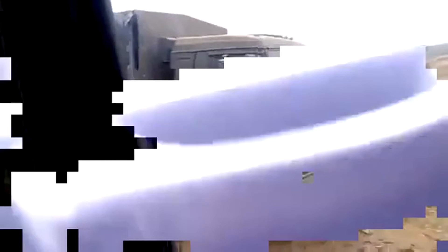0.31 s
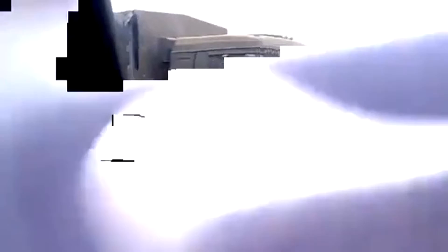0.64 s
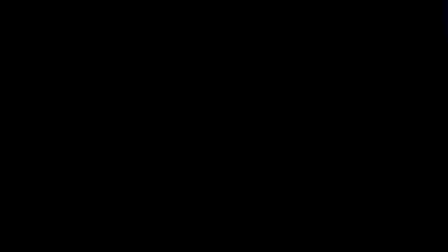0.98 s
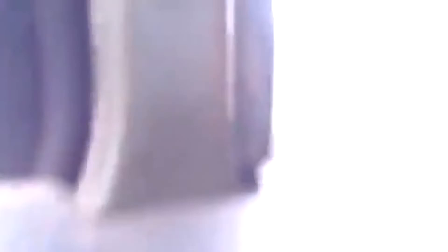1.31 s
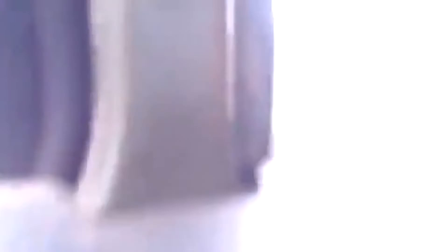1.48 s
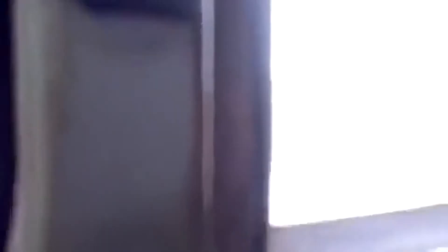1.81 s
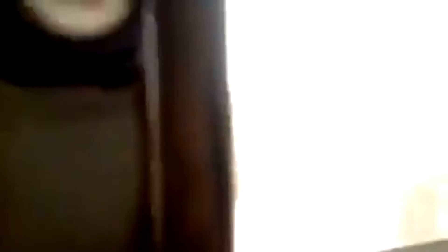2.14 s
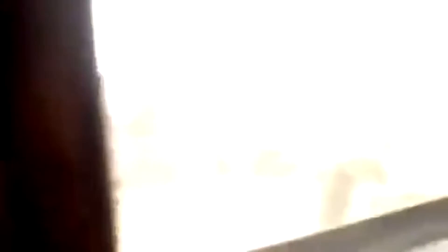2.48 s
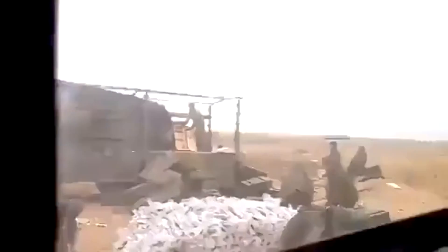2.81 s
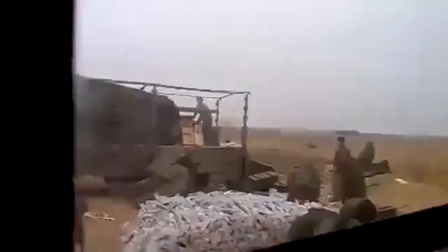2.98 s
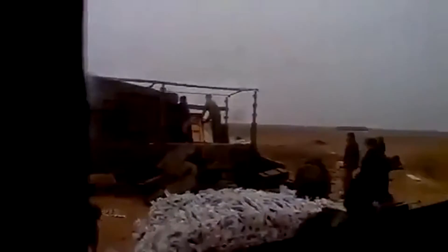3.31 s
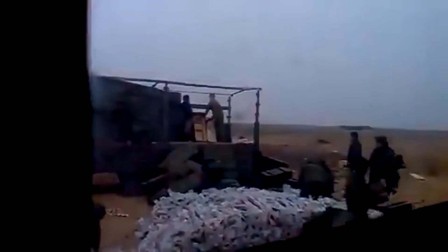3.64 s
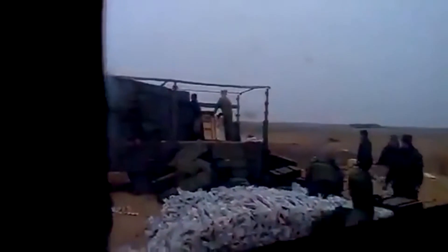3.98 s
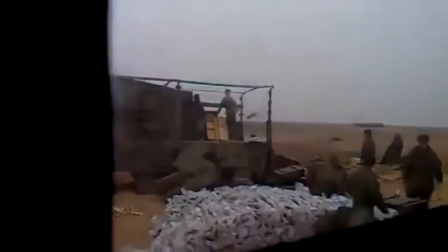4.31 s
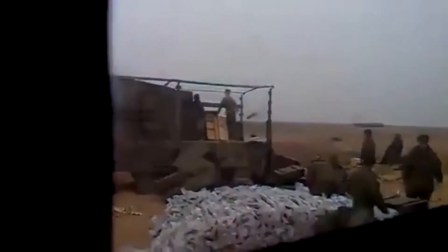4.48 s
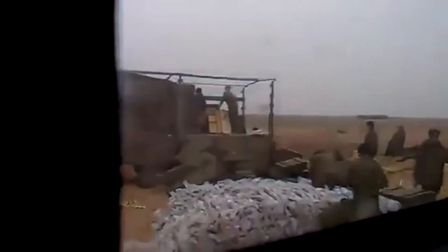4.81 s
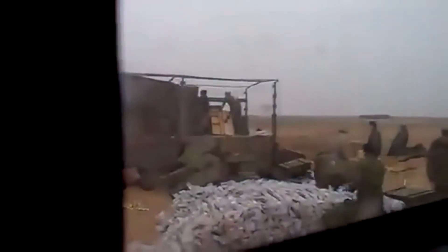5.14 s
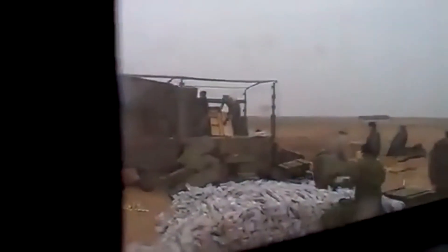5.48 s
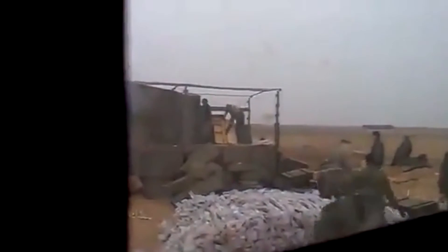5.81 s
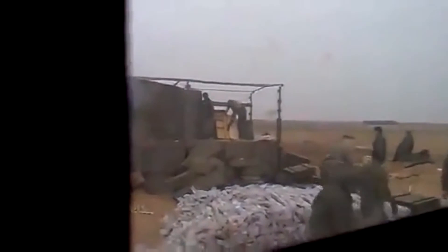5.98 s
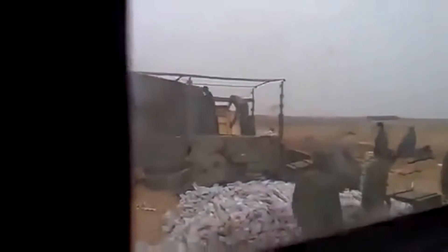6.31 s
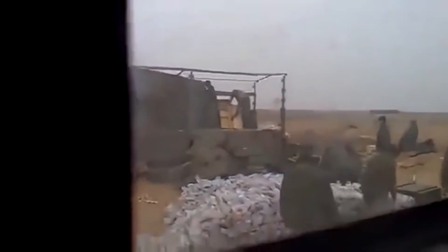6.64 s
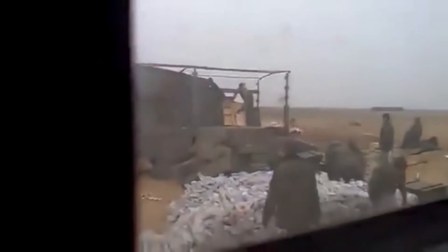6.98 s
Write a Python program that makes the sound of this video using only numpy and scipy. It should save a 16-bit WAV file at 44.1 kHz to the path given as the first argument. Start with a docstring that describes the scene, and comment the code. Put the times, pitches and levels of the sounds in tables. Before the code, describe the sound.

Inside a truck cab, a hand rubs, bumps and clicks right on the microphone. The cab door slams with a deep boom. A quieter stretch follows, with faint handling rustle, small ticks and a few distant metal clinks. Then a heavy wooden crate lands outside with a loud crack, a thud and a clank of steel shell cases, and settles with small knocks. The microphone sounds dull and overloads on the hardest blows.

```python
"""In a truck cab, while crates and metal shell cases are thrown off another truck.
A hand rubs and clicks on the microphone's casing (friction and small impacts). The cab door slams,
compressing the enclosed air into a boom. Then a heavy crate lands and bounces: its boards and the
steel cases vibrate in damped modes, the ground thuds and the pile settles over faint outdoor air.
The microphone is dull, and the hardest blows overload it."""
import sys
import numpy as np
from scipy.fft import rfft, irfft, next_fast_len
from scipy.io import wavfile
from scipy.ndimage import map_coordinates

SR = 44100
rng = np.random.default_rng(int(sys.argv[2]) if len(sys.argv) > 2 else 0)


def unload_audio(sound):
    """Save the sound as a 16-bit wav file, at the path given as the first command line argument."""
    columns = np.transpose(np.atleast_2d(sound))
    # keep every value between -1 and 1, then stretch to whole-number steps
    steps = np.round(np.clip(columns, -1, 1) * 32767)
    wavfile.write(sys.argv[1], SR, steps.astype(np.int16))


N = 307818

# Crate landings and bounces; all table levels are relative: (time [s], wood [dB], thud [dB], crack [dB])
LANDINGS = [(5.186, -43.5, -38.5, -42.5), (5.553, -47, -48, -45), (5.564, -48, -56, -40),
            (5.5753, -8, -8.5, -24), (5.594, -19, -28, -22), (5.640, -8.5, -20, -4),
            (5.656, -20.5, -27.5, -19.5), (5.732, -20, -39.5, -38), (5.771, -39, -46, -43.5),
            (5.836, -56, -40, -69), (5.883, -39.5, -50, -57), (5.923, -45.5, -56.5, -61),
            (6.069, -46.5, -37.5, -50), (6.162, -36.5, -54, -49.5), (6.178, -35.5, -53, -43.5),
            (6.237, -42.5, -58, -65.5), (6.427, -56.5, -58, -73), (6.538, -44.5, -62.5, -56)]
# Modes of the crate's boards: (frequency [Hz], level [dB])
BOARD_MODES = [(312, -6), (355, 0.5), (385, 1), (458, -0.5), (495, -7), (563, -4.5), (668, -9), (703, -9.5),
               (878, 0), (943, -1.5), (1012, -12.5), (1151, -3), (1225, -1), (1260, 3.5), (1330, -6.5),
               (1443, -11), (1800, -14.5), (1994, -15), (2525, -20.5), (2565, -17), (3450, -17),
               (3530, -19.5), (5050, -25)]
# Cab resonances driven through the ground: (frequency [Hz], bandwidth [Hz], level [dB])
THUD_MODES = [(31.03, 15, -11), (74.1, 14, 1), (135, 55, -7), (182, 75, -9.5)]
# Spectra of splintering wood and of the rattling load: (frequency [Hz], level [dB])
CRACK_SPECTRUM = [(500, -15), (1200, -0.5), (2000, 11.5), (2500, 4.5), (2950, -16), (3500, -6),
                  (4200, -1.5), (4900, -19), (5700, -15)]
CLATTER_SPECTRUM = [(110, -6.5), (170, 5), (260, -0.5), (400, 2), (620, 1.5), (900, -2.5), (1300, 0.5),
                    (1600, -11.5), (2500, -23), (3600, -12), (5600, -34.5)]
# Modes of a steel shell case: (frequency ratio, level [dB], t60 [s])
SHELL_MODES = [(0.996, 2, 0.094), (1.076, -20.5, .14), (0.849, -10.5, 0.09), (1.715, -23, 0.071),
               (1.79, -24, .08), (1.9, -16, 0.082)]
# Direct blows on shell cases: (time [s], level [dB], frequency [Hz])
CLANKS = [(5.594, -29.5, 2632), (5.640, -13, 2340), (5.656, -8.5, 2347), (5.733, -39, 2586),
          (6.069, -50.5, 2370), (6.164, -37.5, 2604)]
# Door slam, bumps and ground shocks: (time [s], level [dB], frequency [Hz], t60 [s])
BOOMS = [(0.189, -17.5, 75, 0.13), (.462, -15.5, 110, 0.13), (0.494, -15, 158.2, 0.46),
         (0.508, -4.5, 148.2, 0.16), (1.194, -18.5, 345.5, .08), (1.198, -21, 167.7, 0.14),
         (1.795, -35.5, 153, 0.16), (1.981, -30.5, 644, 0.041), (2.1029, -0.5, 77.15, 0.34),
         (2.185, -12, 88.2, 0.18), (2.85, -29, 145, 0.15), (3.964, -38, 177, 0.071),
         (4.375, -34.5, 79.6, 0.36), (5.579, -17, 79.8, 0.12), (6.07, -42.5, 157.5, 0.34)]
# Modes of the cab's air and panels: (frequency ratio, level [dB])
CAB_MODES = [(1.001, 1), (2.021, -17.5), (2.56, -23), (3.148, -26.5), (4.899, -29.5)]
# Modes of the door panel and of the microphone's casing: (frequency [Hz], level [dB], t60 [s])
DOOR_MODES = [(113, -7, .21), (165, -24, .24)]
CASING_MODES = [(370, -10.5, 0.063), (1621, -7.5, 0.027)]
# Taps on the casing and door fittings:
# (time [s], snap [dB], centre [Hz], half-width [octaves], t60 [s], knock [dB])
CLICKS = [(.1885, -8, 1660, 0.27, 0.019, -25), (0.1905, -4, 3300, 0.62, 0.024, -14.5),
          (.2005, -14.5, 3270, 0.8, 0.023, -37), (0.602, -22, 2470, .86, 0.012, -34),
          (.749, -40, 3000, .78, .06, -73), (1.022, -30, 2200, 3.06, 0.062, -59.5),
          (1.194, -8, 2040, 0.43, 0.05, -13.5), (1.213, -23, 1910, 2.5, 0.11, -41.5),
          (1.302, -40.5, 990, 1.1, 0.04, -55.5), (1.7952, -18, 1970, 0.26, 0.023, -25.5),
          (1.808, -42, 1880, 0.49, 0.11, -36), (1.8273, -35, 1874, 0.28, 0.046, -37),
          (1.981, -35, 1800, 2.2, 0.018, -45), (2.1051, -15, 1930, 0.39, 0.061, -18.5),
          (2.2, -27, 2780, 0.59, 0.014, -53), (2.416, -51.5, 2476, 1.8, .055, -41.5),
          (2.983, -48.5, 1800, 0.56, 0.063, -50.5), (3.363, -41, 2760, 0.43, 0.026, -64),
          (3.434, -53, 2110, 0.96, 0.093, -45.5), (3.558, -50.5, 2420, 1.1, 0.065, -46.5),
          (3.588, -24, 2660, 1.06, 0.0091, -41.5), (4.124, -41.5, 2700, 1.23, .015, -43),
          (4.371, -42.5, 3520, 1.65, 0.027, -42), (4.3823, -20.5, 3200, .83, 0.012, -43.5),
          (4.446, -51, 3200, .59, 0.13, -66), (4.519, -56.5, 2890, 0.95, 0.24, -54),
          (4.586, -48, 3330, 0.93, 0.072, -50.5), (4.619, -45, 3300, 1.24, 0.018, -67),
          (4.911, -46, 2760, 1.6, 0.033, -61), (4.996, -47, 2300, .7, 0.027, -44)]
# Spectrum of a knock on the casing: (frequency [Hz], level [dB])
KNOCK_SPECTRUM = [(40, 0.5), (90, 1), (200, -1.5), (400, -0.5), (650, 1.5), (950, -13), (1500, -22),
                  (3000, -41.5)]
# Fingers sliding over the casing: (start [s], duration [s], level [dB])
SLIDES = [(.094, 0.064, -41), (.21, 0.094, -27.5), (.37, 0.029, -31), (.475, 0.035, -31),
          (.575, 0.023, -27), (.63, 0.15, -46), (.85, 0.1, -46), (.915, 0.084, -35), (1.035, 0.062, -32.5),
          (1.085, 0.069, -32.5), (1.19, 0.03, -30.5), (1.8, 0.13, -58.5), (3.56, 0.12, -61),
          (4.1, .11, -68.5), (6.87, 0.078, -67)]
# Shifts of the grip: (start [s], duration [s], sway [dB], rub [dB])
GRIP_SHIFTS = [(0.455, 0.14, -17.5, -24.5), (0.481, 0.04, -21, -21), (.63, .075, -23.5, -41.5),
               (0.844, 0.26, -37, -46.5), (1.246, .06, -38.5, -47), (1.386, 0.13, -45, -52.5),
               (1.65, 0.095, -54, -62), (1.8, 0.24, -46, -56), (2.254, .14, -34, -53),
               (2.459, 0.088, -47.5, -57), (2.765, .15, -40, -57.5), (2.942, 0.26, -33.5, -48),
               (3.068, 0.04, -31, -41), (3.248, .17, -47, -62.5), (3.546, 0.1, -47, -61.5),
               (4.378, .09, -47, -63), (4.543, .05, -48, -65), (4.737, 0.099, -49, -59.5),
               (4.817, 0.12, -41.5, -55), (5.472, 0.077, -50.5, -57.5), (6.365, 0.1, -64, -65)]
# Noise spectra, from low rumble to a skidding edge: (frequency [Hz], level [dB])
RUMBLE_SPECTRUM = [(15, -8.5), (28, 5.5), (55, -6), (82, 0), (115, -10.5), (170, -14.5), (300, -56)]
RUB_SPECTRUM = [(70, -27), (150, 4), (230, -5.5), (370, -5.5), (580, -9), (800, -12), (1050, -14.5),
                (1600, -17.5), (3000, -46)]
HISS_SPECTRUM = [(400, -30.5), (900, -3), (1500, 0), (2300, 2.5), (3500, -2.5), (4600, -4), (5700, -7.5)]
SKID_SPECTRUM = [(1500, -22.5), (2700, -17), (3300, 1.5), (4550, -2.5), (5000, -25)]
# Distant clinks of metal: (time [s], level [dB], frequency [Hz])
CLINKS = [(2.399, -51, 3276), (2.647, -55.5, 3244), (4.063, -55.5, 3280), (4.573, -43, 2550),
          (4.575, -47, 4140), (4.818, -52, 3100)]
# Movements of the pile under the falling load: (start [s], duration [s], level [dB])
PILE_STIRS = [(5.19, 0.22, -69), (5.58, 0.14, -57.5), (6.07, 0.19, -66)]
# Reflections off the dashboard, windscreen and walls: (delay [s], level [dB])
CAB_REFLECTIONS = [(.0023, -23.5), (.0041, -23.5), (.0067, -18), (.0094, -16), (.0127, -16), (0.0175, -19),
                   (.0233, -20)]


def crates():
    """Impact excitation: each landing rings and cracks the wood, shakes the load and thuds the ground."""
    out = np.zeros(N)
    shell_hz, shell_spread = 2560, 0.032
    for s, wood_db, thud_db, crack_db in LANDINGS:
        wood = amp(-10) * boards()
        jostle = unit(amp(2.7 * wobble(160)))[:len(age())]  # the load knocks about unevenly
        rattle = fade(0.066, 0.00069) + amp(-20) * jostle * fade(0.61, 0.012)
        clatter = amp(-2.5) * burst(shape(CLATTER_SPECTRUM), rattle)
        thud = burst(resonances(THUD_MODES), fade(0.21, 0.006))
        crack = burst(shape(CRACK_SPECTRUM), fade(0.047, 0.001) + amp(-13.5) * fade(0.15, 0.0025))
        steel = amp(-23) * shell_case(shell_hz * (1 + shell_spread * rng.standard_normal()))
        crate = amp(wood_db) * (wood + clatter + steel)
        add(out, s, crate + amp(thud_db) * thud + amp(crack_db) * crack)
    return out


def boards(t60_at_500_hz=0.15, detune=0.0055):
    """Internal damping: wood loses its high modes sooner; each landing's load detunes them slightly."""
    modes = [(hz * (1 + detune * rng.standard_normal()), db, t60_at_500_hz * (hz / 500) ** -0.15)
             for hz, db in BOARD_MODES]
    return ringing(modes, scatter_db=3, attack=0.0008, rough=0.63)


def shell_case(hz):
    """Free vibration: a struck steel case rings in inharmonic modes."""
    modes = [(hz * ratio, db, t60) for ratio, db, t60 in SHELL_MODES]
    return ringing(modes, scatter_db=2.5, attack=0.0039, rough=0.4)


def clanks():
    """Direct impact: each struck shell case sounds at its own natural frequencies."""
    out = np.zeros(N)
    for s, db, hz in CLANKS:
        add(out, s, amp(db) * shell_case(hz))
    return out


def cab_booms():
    """Cavity resonance: the slam, bumps and ground shocks ring the cab's air and panels."""
    out, t = np.zeros(N), age()
    for s, db, hz, t60 in BOOMS:
        boom = sum(amp(level) * np.sin(2 * np.pi * hz * ratio * t) for ratio, level in CAB_MODES)
        add(out, s, -amp(db) * fade(t60, 0.0015) * boom)
    return out


def door_slam(time_s=2.106):
    """Panel vibration: the door rings under a dull blow, and loose trim chatters."""
    out, t = np.zeros(N), age()
    panel = ringing(DOOR_MODES, scatter_db=1.5, attack=0.0015, rough=0.4)
    chatter = unit(amp(3.2 * wobble(270)))[:len(t)] / (1 + (t / 0.2) ** 6)  # dies out after 0.2 s
    trim = amp(-33) * chatter * burst(shape(HISS_SPECTRUM), fade(1.0, 0.0055))
    blow = amp(-20) * burst(shape(RUB_SPECTRUM), fade(0.28, 0.003))
    add(out, time_s, panel + trim + blow)
    return out


def clicks():
    """Structure-borne sound: a near contact gives a bright snap and a hollow knock in the casing."""
    out = np.zeros(N)
    for s, db, hz, octaves, t60, knock_db in CLICKS:
        knock = burst(shape(KNOCK_SPECTRUM), fade(0.028, 0.00048))
        casing = ringing(CASING_MODES, scatter_db=0, attack=0.00027, rough=0.36)
        add(out, s, amp(db) * snap(hz, octaves, t60) + amp(knock_db) * (knock + casing))
    return out


def snap(hz, octaves, t60, contact_hz=6040):
    """Hard contact: one band rings, and the finite contact time excites little above contact_hz."""
    band = lambda f: 1 / (1 + (np.log2((f + 1) / hz) / octaves) ** 2) / (1 + (f / contact_hz) ** 10)
    cab_tail = amp(-28) * fade(0.11, 0.008)
    return burst(band, fade(t60, 0.000083) + cab_tail)


def handling():
    """Stick-slip friction on the casing: sliding fingers mostly hiss; a shifting grip sways and rubs."""
    slide = strokes(SLIDES, attack=0.026, release=0.16, linger_db=-21.5, linger_t60=2.1)
    sways = [(s, length, db) for s, length, db, _ in GRIP_SHIFTS]
    drags = [(s, length, db) for s, length, _, db in GRIP_SHIFTS]
    sway = strokes(sways, attack=0.026, release=0.26, linger_db=-13, linger_t60=1.9)
    drag = strokes(drags, attack=0.026, release=0.26, linger_db=-19, linger_t60=1.1)
    hiss_level = np.hypot(slide, amp(-14.5) * drag)
    # the grain appears only when the hand presses and slides
    pressure = np.clip((20 * np.log10(hiss_level) + 62.5) / 22, 0, 1)
    grain = amp(pressure * (2.26 * wobble(36) + 2 * wobble(500)))
    rumble = np.hypot(sway, amp(-4.5) * slide) * noise(shape(RUMBLE_SPECTRUM))
    rub = np.hypot(drag, amp(-16) * slide) * noise(shape(RUB_SPECTRUM))
    hiss = hiss_level * noise(shape(HISS_SPECTRUM))
    skid_level = strokes([(1.2, 0.052, -27.5)], attack=0.017, release=0.032)  # an edge, after a knock
    skid = skid_level * noise(shape(SKID_SPECTRUM))
    return amp(-1) * rumble + amp(-2.5) * grain * (rub + hiss + skid)


def clinks():
    """Narrow resonance: distant metal rings faintly and briefly."""
    out = np.zeros(N)
    for s, db, hz in CLINKS:
        add(out, s, amp(db) * snap(hz, octaves=0.098, t60=0.038))
    return out


def pile():
    """Frictional settling: the disturbed pile rumbles and rustles as its motion decays."""
    layers = [(10.5, RUMBLE_SPECTRUM), (0, CLATTER_SPECTRUM), (-4, HISS_SPECTRUM)]
    return strokes(PILE_STIRS, attack=0.02, release=1.5) * noise_layers(layers)


def outdoor_air(onset_s=0.084):
    """Stationary ambient noise: a low rumble under a faint hiss."""
    layers = [(-62, RUMBLE_SPECTRUM), (-72, RUB_SPECTRUM), (-69, HISS_SPECTRUM)]
    return (np.arange(N) / SR > onset_s) * noise_layers(layers)


def reflected(x):
    """Comb filtering: early reflections in the cab interfere with the direct mids and treble."""
    paths = lambda f: sum(amp(db) * np.exp(-2j * np.pi * f * s) for s, db in CAB_REFLECTIONS)
    return x + filtered(x, lambda f: paths(f) * f / (f + 300))


def ringing(modes, scatter_db, attack, rough):
    """Modal superposition: damped sines of random strength; loose contact roughens their phase."""
    t, out = age(), 0
    for hz, db, t60 in modes:
        drift = rough * np.cumsum(rng.standard_normal(len(t))) / np.sqrt(SR)
        strength = amp(db + scatter_db * rng.standard_normal())
        out = out + strength * fade(t60, attack) * np.sin(2 * np.pi * (hz * t + drift + rng.random()))
    return out


def burst(response, envelope):
    """Dense modes merge into noise, whose energy equals that of the envelope."""
    x = noise(response, size=len(envelope)) * envelope
    return x * np.linalg.norm(envelope) / np.linalg.norm(x)


def strokes(rows, attack, release, linger_db=-120, linger_t60=1):
    """Incoherent movements add in power; each rises, holds and decays (release is a t60) to a tail."""
    t, power = np.arange(0, N, 64) / SR, 1e-20
    for s, length, db in rows:
        rise = np.clip((t - s) / attack, 0, 1)
        after = np.maximum(t - s - length, 0)
        fall = amp(-60 * after / release) + amp(linger_db - 60 * after / linger_t60)
        power = power + (amp(db) * rise * fall) ** 2
    return np.interp(np.arange(N) / SR, t, np.sqrt(power))


def fade(t60, attack):
    """Exponential decay of 60 dB in t60 seconds, after a quick rise."""
    return amp(-60 * age() / t60) * (1 - np.exp(-age() / attack))


def age():
    """Time since a blow [s]."""
    return np.arange(SR // 2) / SR


def wobble(rate):
    """Smooth random modulation, with rate knots a second."""
    return map_coordinates(rng.standard_normal(int(N * rate / SR) + 4), [np.arange(N) * rate / SR])


def noise(response, size=N):
    """Coloured noise of rms 1."""
    return unit(filtered(rng.standard_normal(size), response))


def noise_layers(layers):
    """Superposition of independent noises: (level [dB], spectrum)."""
    return sum(amp(db) * noise(shape(spectrum)) for db, spectrum in layers)


def resonances(modes):
    """Frequency response of damped oscillators, summed with alternating signs."""
    return lambda f: sum((-1) ** k * amp(db) * 1j * f * width / (hz * hz - f * f + 1j * f * width)
                         for k, (hz, width, db) in enumerate(modes))


def shape(points):
    """Spectral envelope through (frequency [Hz], level [dB]) points on a log axis."""
    hz, db = np.transpose(points)
    return lambda f: amp(np.interp(np.log(f + 1), np.log(hz), db))


def filtered(x, response):
    """Linear filtering: the spectrum of x times a frequency response."""
    size = next_fast_len(len(x) + 8192)
    return irfft(rfft(x, size) * response(np.fft.rfftfreq(size, 1 / SR)), size)[:len(x)]


def amp(db):
    """Amplitude ratio of a level in decibels."""
    return 10 ** (np.asarray(db) / 20)


def unit(x):
    """Normalisation to rms 1."""
    return x / np.sqrt(np.mean(x ** 2) + 1e-20)


def add(track, s, sound):
    """Superpose a sound at time s."""
    part = track[round(s * SR):][:len(sound)]
    part += sound[:len(part)]


def scene():
    """Superposition: hand, air and pile sound through the cab's reflections; impacts add directly."""
    rustle = reflected(handling() + outdoor_air() + pile())
    return (rustle + clicks() + clinks() + crates() + clanks() + cab_booms() + door_slam())[None]


def record(dry):
    """Band limiting, then saturation: loud peaks distort and spread treble above the microphone's band."""
    mic_hz, top_hz, ceiling = 5650, 16000, 0.71
    dull = filtered(dry[0], lambda hz: 1 / np.sqrt(1 + (hz / mic_hz) ** 110))
    saturated = dull / (1 + np.abs(dull / ceiling) ** 10) ** (1 / 10)
    return filtered(saturated, lambda hz: hz < top_hz)[None]


dry = scene()
out = record(dry)
unload_audio(out)
```